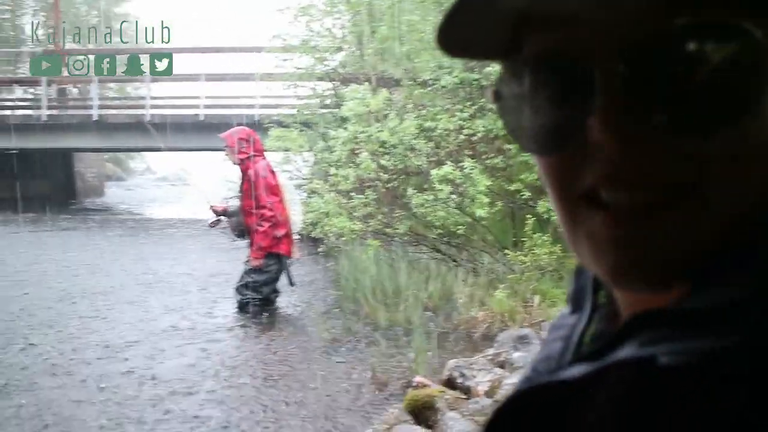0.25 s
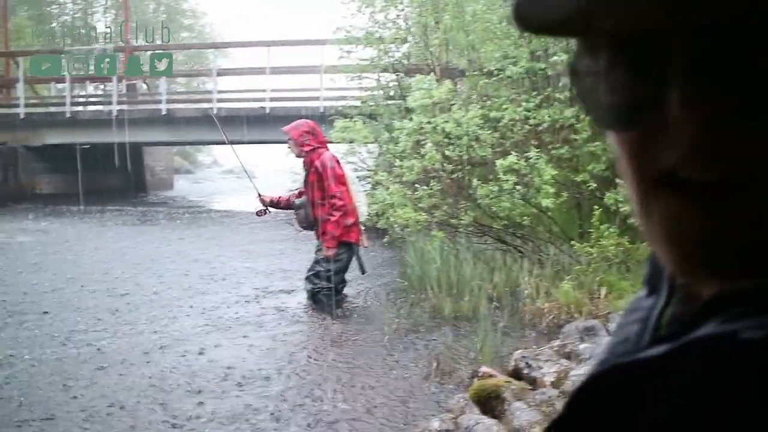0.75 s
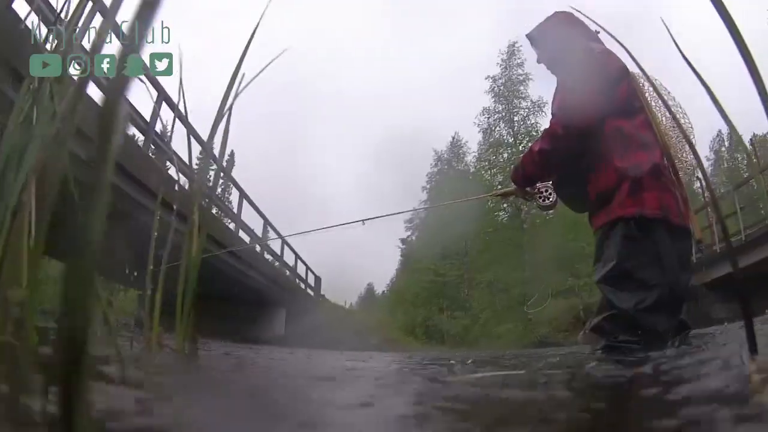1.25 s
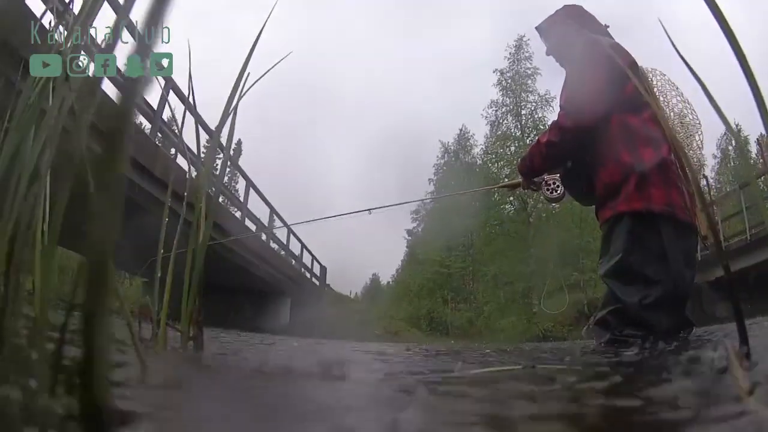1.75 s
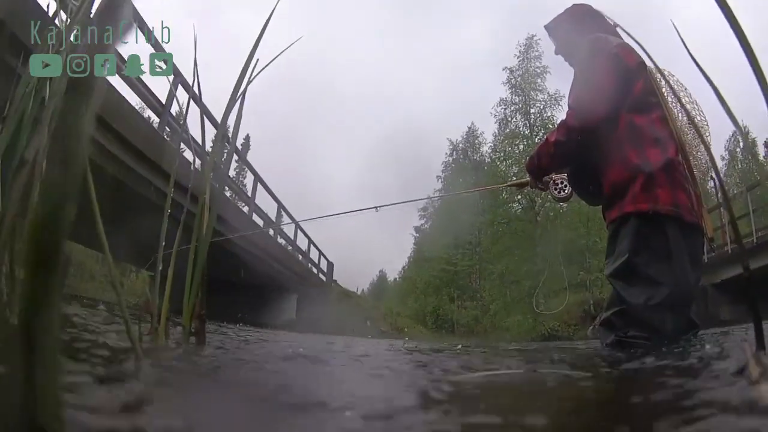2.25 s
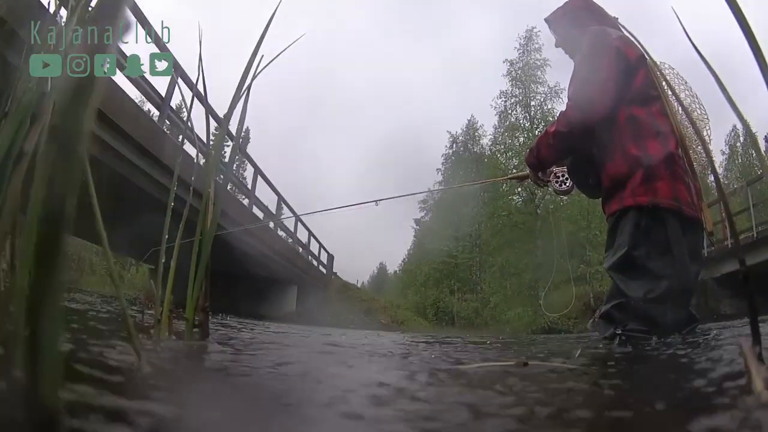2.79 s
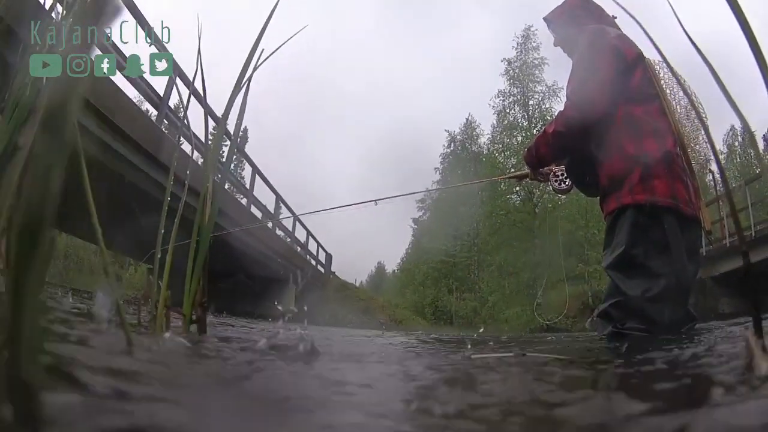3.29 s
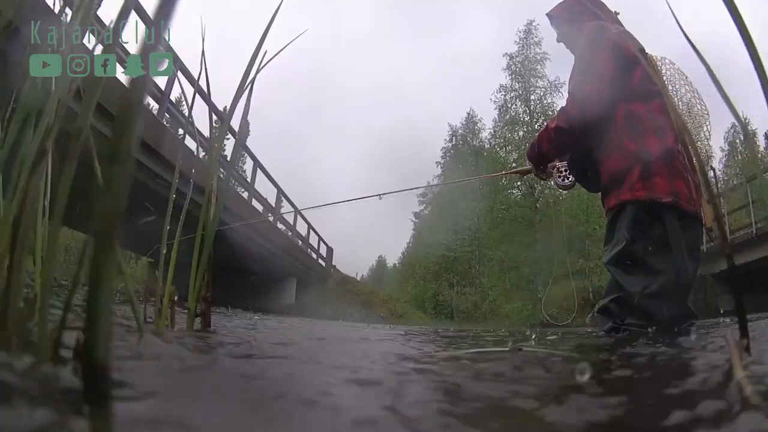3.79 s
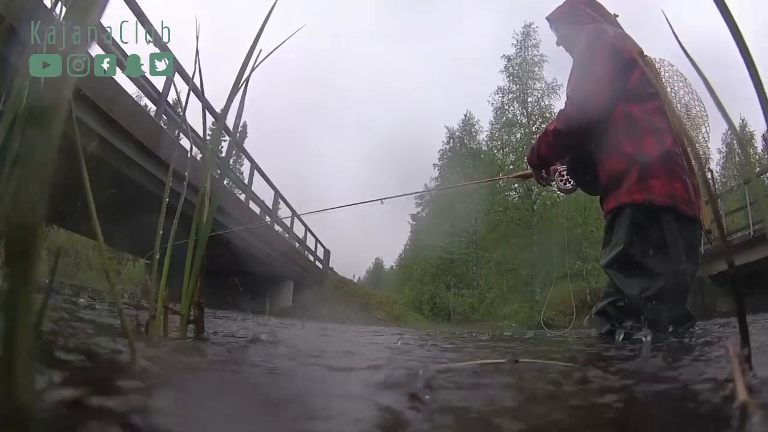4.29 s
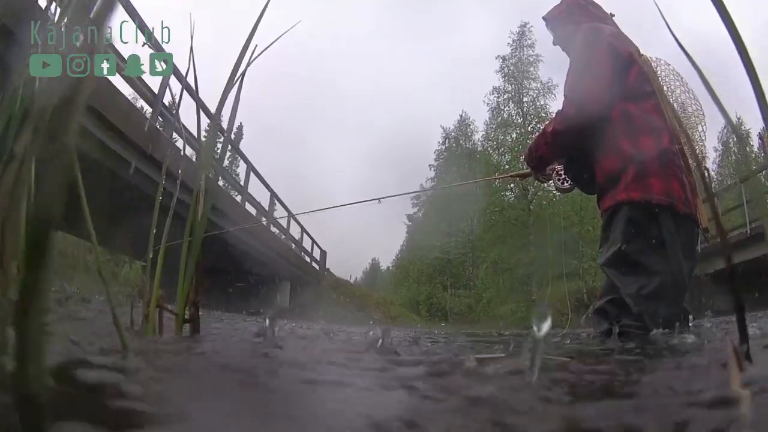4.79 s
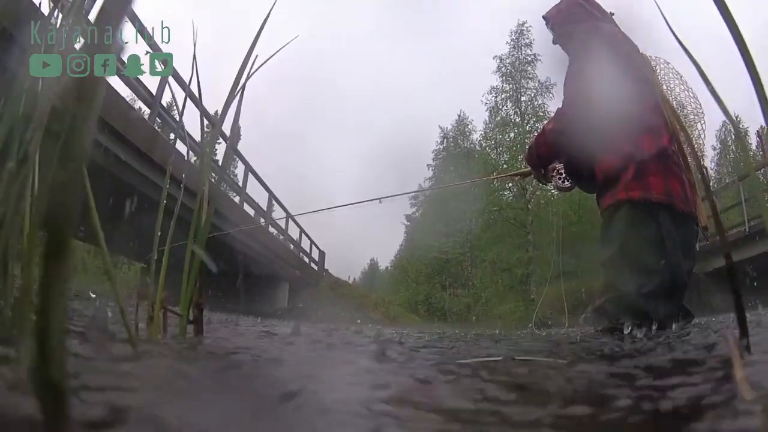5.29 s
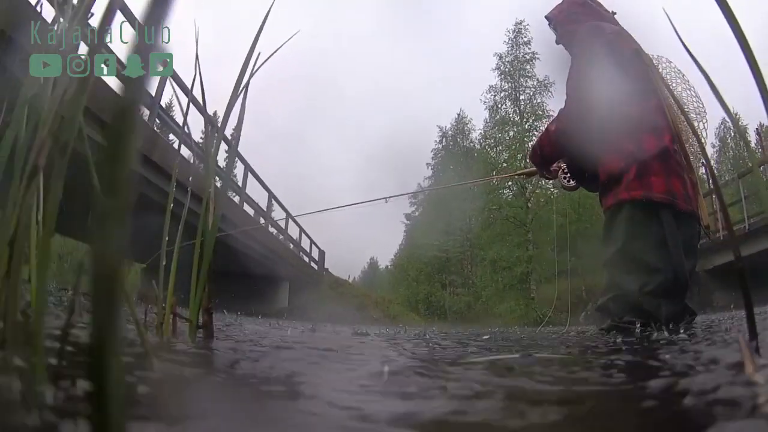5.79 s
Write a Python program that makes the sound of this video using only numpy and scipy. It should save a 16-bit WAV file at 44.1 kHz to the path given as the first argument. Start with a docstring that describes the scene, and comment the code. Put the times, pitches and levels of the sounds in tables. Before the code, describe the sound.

A loud downpour on a river for about a second, then suddenly faint enclosed rain, low current rumble, scattered plastic ticks and small spatters.

```python
"""Heavy rain on a river, heard first from the bank: noise and random clicks make a dense hiss of drops,
sine bubbles gurgle in the rushing water and short noise bursts spat close by. Then, abruptly, we are just above
the water inside a waterproof case. Filtered noise makes the muffled rain and the rumble of the current;
single drops set the ringing tones of the shell ticking, among spatters, running water and soft thumps."""
import sys
import numpy as np
from scipy import signal
from scipy.fft import rfft, irfft
from scipy.io import wavfile

SR = 44100
rng = np.random.default_rng(int(sys.argv[2]) if len(sys.argv) > 2 else 0)


def master(y):
    """Save y as 16-bit WAV."""
    cut = np.clip(np.atleast_2d(y).T, -1, 1)
    pcm = np.round(cut * 32767)  # scale
    wavfile.write(sys.argv[1], SR, pcm.astype(np.int16))


N = 266805
TIME = np.arange(N) / SR   # seconds
CUT_S, CUT_FADE_S = 1.219, 0.0086   # middle and length of the crossfade from bank to case
CUTOFF_HZ = 15900   # top of the whole sound

# Soft knocks and nudges of water: (time [s], pitch [Hz], peak level [dB])
THUMPS = [(0.022, 84.5, -34.5), (0.143, 130, -25), (1.128, 138, -13), (2.952, 150, -34.5), (3.392, 80, -37),
          (3.44, 128, -36), (4.2, 135, -36), (5.088, 115, -34), (5.303, 147, -31.5), (5.315, 230, -32),
          (5.457, 190, -32), (5.731, 179, -31.5)]
THUMP_CYCLES = 0.45   # half length of a thump

# Tone colour of the river from the bank: (frequency [Hz], relative level per Hz [dB])
RIVER_COLOUR = [(18, -57), (30, -25), (70, -8), (102, -9.5), (139, -6.5), (326, -9), (464, -4.5),
                (548, -3.5), (824, -3), (1070, 0), (1310, -3.5), (1550, -1.5), (2500, -6.5), (3250, -66),
                (5500, -120)]
# Strength of the river's rush: (time [s], level [dB])
RIVER_FLOW = [(0.0, -31.5), (0.056, -28), (0.266, -26), (0.292, -28.5), (0.46, -23.5), (0.47, -28),
              (0.758, -25.5), (0.788, -22.5), (0.812, -25), (1.21, -24)]
# Large bubbles in the river: (time [s], starting pitch [Hz], level before its soft onset [dB])
GURGLES = [(0.062, 1925, -18), (0.123, 552, -16.5), (0.196, 1476, -15), (0.25, 747, -17.5),
           (0.405, 1575, -18), (0.775, 524, -16), (0.783, 1618, -18), (0.978, 1133, -13.5),
           (1.064, 1750, -16), (1.117, 1164, -16.5), (1.151, 1373, -18)]
GURGLE_T60_S = 0.06   # time to die away by 60 dB

# Tone colour of the current against the case: (frequency [Hz], relative level per Hz [dB])
CURRENT_COLOUR = [(15, -43), (25, -1), (43, -5.5), (70, 0.5), (128, 1.5), (223, -4), (253, -3), (436, -13),
                  (592, -22), (700, -22.5), (910, -50), (1540, -120)]
# Push of the current against the case: (time [s], level [dB])
CURRENT_FLOW = [(1.27, -54), (1.89, -53), (2.72, -57.5), (3.11, -56), (3.4, -50), (3.68, -52),
                (4.88, -51.5), (5.22, -47), (5.42, -52), (6.05, -51.5)]

# Tones that running water excites in the shell: (frequency [Hz], relative level [dB], 60 dB decay time [s])
FILM_MODES = [(1410, -10, 0.033), (2340, -0.5, 0.0081), (3170, -6.5, 0.021), (5100, -1, 0.015)]
# Water running off over the case: (time of crest [s], level at crest [dB], half length [s])
RUNOFFS = [(1.666, -55, .06), (5.574, -48.5, 0.06), (5.95, -46, .11)]
# One bubble surfacing: (start [s], first pitch [Hz], last pitch [Hz], length [s], peak level [dB])
PLOP = (4.229, 1080, 2100, .024, -46)
# Drops trapping a bubble by the case: (time [s], pitch [Hz], level before softening [dB], 60 dB decay time [s])
PINGS = [(1.5942, 2270, -24.5, 0.031), (2.4037, 3090, -23, 0.019), (4.492, 7400, 6.5, 0.0021)]

# Water spattering over the case: (time of crest [s], level at crest [dB], half length [s])
SPATTERS = [(3.113, -40, 0.012), (3.694, -37.5, 0.0056), (3.942, -36, 0.0083), (4.4635, -32.5, 0.0012),
            (4.706, -40, 0.009), (5.919, -28.5, 0.0029), (5.96, -19.5, .003), (6.0195, -29.5, 0.0014)]
# Tones that a spatter excites in the shell: (frequency [Hz], relative level [dB], 60 dB decay time [s])
SPATTER_MODES = [(2336, 15.5, 0.023), (2550, 6, 0.027), (4890, 8, 0.019)]
# Droplets against ringing in a -40 dB spatter [dB]; share lost per dB of greater strength
SPRAY_DB, SPRAY_FALL = 14, 0.51

# Tones of the case: (frequency [Hz], relative level [dB], 60 dB decay time [s])
SHELL_MODES = [(434, -17, 0.0028), (995, -6, 0.013), (1360, -6.5, 0.0067), (2035, -4.5, 0.012),
               (2358, -3, 0.018), (3570, -6.5, 0.0026), (4750, -2.5, 0.0043), (5630, -4, 0.0044),
               (6820, -4, 0.0014), (7900, -4, 0.00089), (9820, -10, 0.0027), (13100, -19, 0.0068)]
# Heavy drops on the case: (time [s], relative strength [dB], brightness [dB per octave],
# focus: loss one octave from the centre [dB])
HEAVY_DROPS = [(1.4008, -34.5, 6, 5.5), (1.5025, -39.5, -2, -1), (1.5473, -45, -4.5, 4),
               (1.5942, -34, 0.5, 7.5), (1.6174, -39, 0, 0), (2.2029, -44, -4, 9.5), (2.3587, -51.5, -8, 1),
               (2.4024, -45, -1, 4.5), (2.4237, -40, 2, 5.5), (2.6451, -48.5, -5, -0.5),
               (2.7119, -52, 7.5, 6.5), (2.9509, -30.5, 0.5, 1), (3.2666, -48.5, 7, 4.5),
               (3.3227, -37.5, -3, 0), (3.4199, -46.5, 0, 4.5), (3.4363, -33.5, -2.5, 6),
               (3.478, -38, -0.5, 5), (3.622, -40, 5, 5), (3.8157, -39.5, 0.5, 7.5),
               (4.1908, -34.5, -1.5, 3.5), (4.3224, -41, -1.5, -0.5), (4.587, -42.5, 2, 9),
               (4.6869, -44, -2.5, 5), (4.73, -46, 3, 4.5), (5.1467, -52, -5.5, 3),
               (5.204, -49.5, -4, -1.5), (5.2708, -50.5, -2, -2.5), (5.3609, -33, 2.5, 2.5)]
DROP_CENTRE_HZ = 2260   # brightness and focus tilt the tones around here
DROP_LOW_HZ, DROP_HIGH_HZ = 1260, 7300   # beyond these a drop's colour levels off
# Lighter drops land at random, with relative strength [dB], brightness [dB per octave] and focus [dB]
LIGHT_DROPS_PER_S, LIGHT_DROP_DB, LIGHT_SPREAD_DB = 13, -55, 2.0
LIGHT_BRIGHTNESS_DB, BRIGHTNESS_SPREAD_DB, LIGHT_FOCUS_DB = -1, 3, 6

# Drops bursting close by on the bank: (time [s], level [dB], centre frequency [Hz])
SPATS = [(0.0346, -20.5, 5000), (0.303, -18, 4100), (0.4754, -19.5, 10100), (0.487, -21, 5970),
         (0.605, -20, 5700), (0.6117, -20.5, 5600), (0.866, -14.5, 5500), (0.9732, -20.5, 4800),
         (1.032, -16.5, 6650), (1.08, -24, 10000)]
# Tone colour of the rain in the open: (frequency [Hz], relative level per Hz [dB])
RAIN_COLOUR = [(1470, -18), (2500, 0.5), (3540, -1.5), (6160, -2), (6970, -3.5), (8930, -4.5), (10700, -9),
               (13200, -11.5), (15100, -16.5), (15800, -33)]
RAIN_DB, RAIN_SWELL_DB_PER_S = -26, 4.5   # starting level; the downpour grows steadily
# Tone colour of the rain inside the case: (frequency [Hz], relative level per Hz [dB])
MUFFLED_COLOUR = [(320, -39.5), (550, -14.5), (758, -17), (884, -7), (1170, -20), (1440, -5.5), (1590, -24),
                  (2220, -0.5), (2420, -0.5), (3020, -13), (3290, -15.5), (4230, -11.5), (5210, -8.5),
                  (6520, -14.5), (15500, -35)]
# Strength of the rain inside the case: (time [s], level [dB])
RAINFALL = [(1.27, -50.5), (2.41, -56.5), (3.99, -51.5), (4.81, -54), (5.16, -50), (5.52, -56), (5.88, -50),
            (6.05, -46.5)]


def from_db(db):
    """Turn decibels into a gain."""
    return 10 ** (np.asarray(db) / 20)


def rms_one(x):
    """Scale a sound to an average strength (rms) of 1."""
    return x / np.sqrt(np.mean(x ** 2) + 1e-20)


def level_in_time(rows):
    """Join the points of a (time, level) table with straight lines."""
    s, db = np.transpose(rows)
    return np.interp(TIME, s, db)


def add(out, s, sound):
    """Mix a sound in, starting at time s."""
    at = int(np.clip(round(s * SR), 0, N - 1))
    out[at:at + len(sound)] += sound[:N - at]


def band(x, low_hz, high_hz):
    """Keep only the range between two frequencies."""
    edges = [low_hz, min(high_hz, .45 * SR)]
    return signal.sosfilt(signal.butter(2, edges, "band", fs=SR, output="sos"), x + 1e-18)


def drift(rate_hz):
    """Smoothed noise wanders slowly at random, with a spread of 1."""
    step = 40   # samples between computed points
    r = np.exp(-2 * np.pi * rate_hz * step / SR)
    noise = rng.standard_normal(N // step + 2002)
    slow = signal.lfilter([1], [1, -2 * r, r * r], noise)[2000:]   # drop the filter's start-up
    return np.interp(np.arange(N) / step, np.arange(len(slow)), rms_one(slow))


def ring(clicks, hz, t60):
    """Each unit click starts a sine that dies away by 60 dB in t60 seconds."""
    r = np.exp(-np.log(1000) / (t60 * SR))
    w = 2 * np.pi * hz / SR
    return signal.lfilter([0, np.sin(w)], [1, -2 * r * np.cos(w), r * r], clicks + 1e-18)


def coloured(x, colour):
    """Shape the tone by a table, falling 40 dB per octave more beyond its ends; rms 1."""
    hz, db = np.transpose(colour)
    log_hz = np.log2(np.maximum(np.arange(N // 2 + 1) * SR / N, 1))
    octaves_outside = np.abs(log_hz - np.clip(log_hz, np.log2(hz[0]), np.log2(hz[-1])))
    gain_db = np.interp(log_hz, np.log2(hz), db) - 40 * octaves_outside
    return rms_one(irfft(rfft(x) * from_db(gain_db), N))


def impacts(per_s, spread_db):
    """Clicks at random moments, many small and a few large."""
    sizes = from_db(spread_db * np.minimum(rng.exponential(1, N), 4.5))
    return (rng.random(N) < per_s / SR) * sizes * rng.choice([-1, 1], N)


def bubbles(per_s, spread_db, low_hz, high_hz, cycles, count=28):
    """Random impacts each ring at one of many pitches, fading 60 dB in some cycles; rms 1."""
    clicks = impacts(per_s, spread_db)
    dealt = rng.integers(0, count, N)   # which pitch each click gets
    out = np.zeros(N)
    for k, hz in enumerate(np.geomspace(low_hz, high_hz, count)):
        out += ring(clicks * (dealt == k), hz, cycles / hz)
    return rms_one(out)


def wash(colour, flutter_db, flutter_hz):
    """Steady water sound: coloured noise whose strength flutters a little; rms 1."""
    noise = rng.standard_normal(N) * from_db(flutter_db * drift(flutter_hz))
    return coloured(noise, colour)


def microphone_hiss():
    """Faint, steady high noise."""
    return from_db(-66.5) * rms_one(band(rng.standard_normal(N), 4700, 14700))


def thumps():
    """Each thump is a cycle or two of low pressure swing."""
    out, t = np.zeros(N), TIME[:4096] - TIME[2048]
    for s, hz, db in THUMPS:
        envelope = from_db(db) * np.exp(-(t * hz / THUMP_CYCLES) ** 2 / 2)
        add(out, s + t[0], envelope * np.cos(2 * np.pi * hz * t))
    return out


def river():
    """Rushing noise and many small ringing bubbles rise and fall together."""
    rush = from_db(-0.67) * wash(RIVER_COLOUR, flutter_db=1.5, flutter_hz=54)
    babble = from_db(-8.0) * bubbles(per_s=330, spread_db=3.0, low_hz=481, high_hz=2710, cycles=39)
    return from_db(level_in_time(RIVER_FLOW)) * (rush + babble)


def gurgles(rise_per_s=1.5, swell_s=0.0019):
    """Each bubble rings and rises in pitch as it nears the surface."""
    out, t = np.zeros(N), TIME[:4096]
    for s, hz, db in GURGLES:
        decay = np.exp(-np.log(1000) * t / GURGLE_T60_S)
        envelope = from_db(db) * decay * (1 - np.exp(-t / swell_s))
        add(out, s, envelope * np.sin(2 * np.pi * hz * t * (1 + rise_per_s * t / 2)))
    return out


def current():
    """The current pushes on the case: low rumbling noise with low ringing glugs."""
    rumble = from_db(1.4) * wash(CURRENT_COLOUR, flutter_db=1.5, flutter_hz=13.4)
    glugs = from_db(-7.5) * bubbles(per_s=45, spread_db=1.5, low_hz=91, high_hz=420, cycles=8.5)
    return from_db(level_in_time(CURRENT_FLOW)) * (rumble + glugs)


def side_rumble():
    """A fainter rumble, later given opposite signs in the two ears."""
    level_db = level_in_time(CURRENT_FLOW) - 12.5
    return from_db(level_db) * wash(CURRENT_COLOUR, flutter_db=2.5, flutter_hz=12)


def film():
    """Fine crackle of running water sings in a few tones of the shell; each runoff swells and ebbs."""
    crackle = np.diff(impacts(per_s=1900, spread_db=3.5), prepend=0)
    flow, singing = np.zeros(N), np.zeros(N)
    for s, db, half in RUNOFFS:
        flow += from_db(db) * np.exp(-((TIME - s) / half) ** 2 / 2)
    for hz, db, t60 in FILM_MODES:
        singing += from_db(db) * rms_one(ring(crackle, hz, t60))
    return flow * rms_one(singing)


def plop():
    """A bubble's pitch climbs as it reaches the surface."""
    s, first_hz, last_hz, length, db = PLOP
    age = np.clip((TIME - s) / length, 0, 1)
    hz = first_hz + (last_hz - first_hz) * age ** 2
    envelope = from_db(db) * np.sqrt(np.abs(np.sin(np.pi * age)))
    return envelope * np.sin(2 * np.pi * np.cumsum(hz) / SR)


def pings(swell_s=0.00018, echo_s=0.00118, echo_db=-8.0):
    """A trapped bubble rings for a moment; the shell softens its onset and returns it once."""
    out, t = np.zeros(N), TIME[:2048]
    for s, hz, db, t60 in PINGS:
        envelope = from_db(db) * (1 - np.exp(-t / swell_s)) * np.exp(-np.log(1000) * t / t60)
        ping = envelope * np.sin(2 * np.pi * hz * t)
        add(out, s, ping)
        add(out, s + echo_s, from_db(echo_db) * ping)
    return signal.sosfilt(signal.butter(4, 9000, fs=SR, output="sos"), out + 1e-18)


def spatter(mist_per_s=4000, droplets_per_s=280):
    """Swells of fine mist keep shell tones ringing; a quick run of larger droplets crackles on top."""
    out, t = np.zeros(N), TIME[:4096] - TIME[2048]
    for s, db, half in SPATTERS:
        envelope = np.exp(-(t / half) ** 2 / 2)
        mist = (rng.random(len(t)) < mist_per_s / SR) * rng.standard_normal(len(t)) * envelope
        ringing = np.zeros(len(t))
        for hz, mode_db, t60 in SPATTER_MODES:
            ringing += from_db(mode_db) * rms_one(ring(mist, hz, t60))
        landings = (rng.random(len(t)) < droplets_per_s / SR) * 1.0
        # each landing fades within about a millisecond, over a faint steady floor
        bursts = signal.lfilter([1], [1, -np.exp(-1 / (.0007 * SR))], landings) + .12
        spray = band(rng.standard_normal(len(t)) * bursts * envelope, 1000, 5600)
        spray_db = SPRAY_DB - SPRAY_FALL * (db + 40)
        swell = rms_one(band(ringing + from_db(spray_db) * rms_one(spray), 1400, 10400))
        crest_scale = np.sqrt(np.mean(envelope ** 2))   # makes the level apply at the crest
        add(out, s + t[0] - .001, from_db(db) * swell * crest_scale)
    return out


def light_drops(count=200):
    """Random drops, with the same columns as HEAVY_DROPS."""
    s = CUT_S + np.cumsum(rng.exponential(1, count)) / LIGHT_DROPS_PER_S
    size, tilt = np.clip(rng.standard_normal((count, 2)), -2, 2).T
    strength_db = LIGHT_DROP_DB + LIGHT_SPREAD_DB * size
    brightness = LIGHT_BRIGHTNESS_DB + BRIGHTNESS_SPREAD_DB * tilt
    rows = [s, strength_db, brightness, np.full(count, LIGHT_FOCUS_DB)]
    return np.transpose(rows)[s < TIME[-1]]


def shell_drops(drops, splash_db=-10.0, splash_s=0.0013, level_db=3.5, push_hz=260, push_t60=0.0039):
    """A sharp hit favours the shell's high tones; a blunt one pushes the whole case."""
    out, t = np.zeros(N), TIME[:1024]
    for s, drop_db, brightness, focus in drops:
        # the drop hits, then spreads within a millisecond or two
        force = from_db(splash_db) * rng.standard_normal(len(t)) * np.exp(-t / splash_s)
        force[0] += 1
        # the film of water loads the shell differently each time
        detune = np.exp(0.068 * rng.standard_normal(len(SHELL_MODES)))
        tick = from_db(drop_db - 13 - brightness) * rms_one(ring(force, push_hz, push_t60))
        sharp_force = np.diff(force, prepend=0)
        for k, (hz, db, t60) in enumerate(SHELL_MODES):
            octaves = np.log2(np.clip(hz, DROP_LOW_HZ, DROP_HIGH_HZ) / DROP_CENTRE_HZ)
            strength = from_db(db + drop_db + brightness * octaves - focus * octaves ** 2)
            tick = tick + (-1) ** k * strength * rms_one(ring(sharp_force, hz * detune[k], t60))
        add(out, s, from_db(level_db) * tick)
    return out


def small_drops(per_s, spread_db, scatter_db=8.0, dull_db=1.0):
    """Fine drops excite each shell tone by a chance amount, weaker by the octave; rms 1."""
    clicks, out = impacts(per_s, spread_db), np.zeros(N)
    at = np.flatnonzero(clicks)
    for k, (hz, db, t60) in enumerate(SHELL_MODES):
        force = np.zeros(N)
        force[at] = clicks[at] * from_db(scatter_db * rng.uniform(-1.3, 1, len(at)))
        out += (-1) ** k * from_db(db - dull_db * np.log2(hz)) * rms_one(ring(force, hz, t60))
    return rms_one(band(out, 540, 9700))


def spats(t60=0.034, spray_db=14.0, slap_t60=0.0018):
    """A very short slap and a stronger, longer spray start together as one noise burst."""
    out, t = np.zeros(N), TIME[:2048]
    for s, db, hz in SPATS:
        envelope = from_db(-60 * t / slap_t60) + from_db(spray_db - 60 * t / t60)
        burst = band(rng.standard_normal(len(t)) * envelope, hz * 0.71, min(hz * 1.32, 13500))
        rounded = 2 * np.tanh(.5 * burst / np.std(burst[:256]))   # tame the tallest peaks
        add(out, s, from_db(db) * rounded)
    return out


def open_rain():
    """Countless far drops merge into hiss, with nearer ones as a patter of clicks."""
    level_db = RAIN_DB + RAIN_SWELL_DB_PER_S * TIME + 0.53 * drift(13)
    hiss = from_db(-3.0) * wash(RAIN_COLOUR, flutter_db=2.0, flutter_hz=49)
    patter = from_db(-6.5) * coloured(impacts(per_s=7500, spread_db=5.0), RAIN_COLOUR)
    return from_db(level_db) * (hiss + patter)


def muffled_rain():
    """The shell dulls and colours the rain: noise, clicks, short ringing plinks and small ticks."""
    hiss = from_db(-4.0) * wash(MUFFLED_COLOUR, flutter_db=0.5, flutter_hz=91)
    patter = from_db(-5.0) * coloured(impacts(per_s=900, spread_db=4.0), MUFFLED_COLOUR)
    plinks = from_db(-7.0) * bubbles(per_s=130, spread_db=4.0, low_hz=1830, high_hz=2700, cycles=25)
    fizz = from_db(-9.0) * bubbles(per_s=160, spread_db=5.0, low_hz=4020, high_hz=5800, cycles=47)
    ticks = from_db(-7.0) * small_drops(per_s=80, spread_db=2.5)
    return from_db(level_in_time(RAINFALL)) * (hiss + patter + plinks + fizz + ticks)


def bank():
    """Open air: rushing, bubbling river, with rain crackling on the water."""
    return river() + gurgles() + spats() + open_rain()


def at_the_water():
    """Inside the case: muffled rain, single drops, water on the shell and the rumbling current."""
    drops = band(shell_drops(HEAVY_DROPS) + shell_drops(light_drops()), 130, 11200)
    close_by = film() + plop() + pings() + spatter() + drops
    return microphone_hiss() + current() + close_by + muffled_rain()


def scene():
    """The bank gives way to the water's edge; only a faint rumble differs between the ears."""
    moved = np.clip((TIME - CUT_S) / CUT_FADE_S + .5, 0, 1)   # 0 on the bank, 1 in the case
    mono = (1 - moved) * bank() + moved * at_the_water() + thumps()
    side = moved * side_rumble()
    return np.array([mono + side, mono - side])


def record(dry):
    """A steep filter removes the very highest sound."""
    return signal.sosfilt(signal.ellip(10, .1, 80, CUTOFF_HZ, fs=SR, output="sos"), dry)


dry = scene()
out = record(dry)
master(out)
```